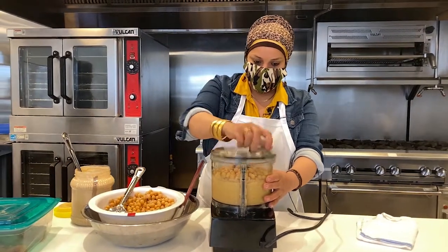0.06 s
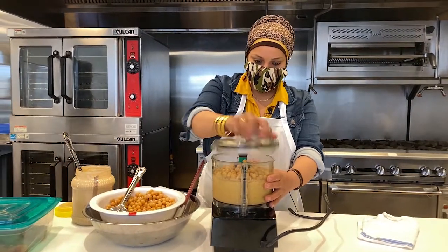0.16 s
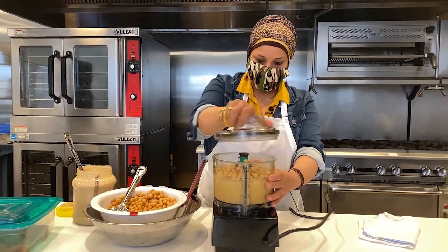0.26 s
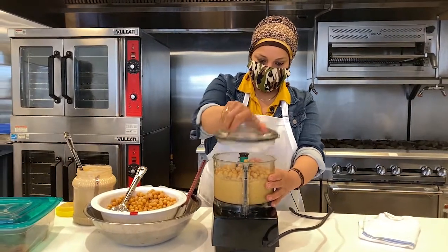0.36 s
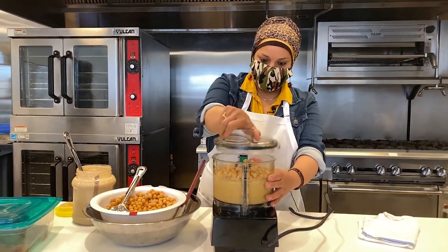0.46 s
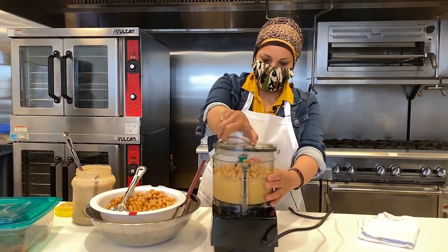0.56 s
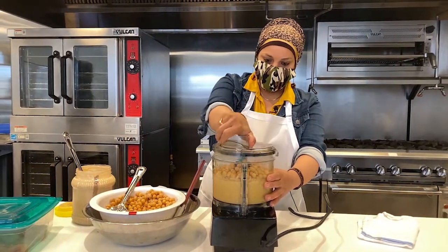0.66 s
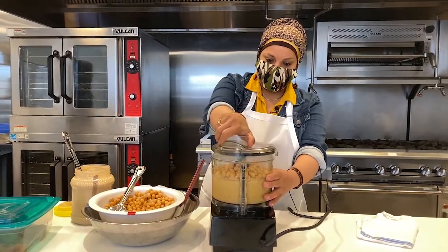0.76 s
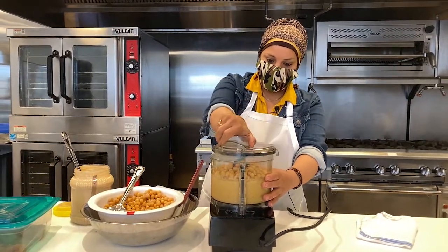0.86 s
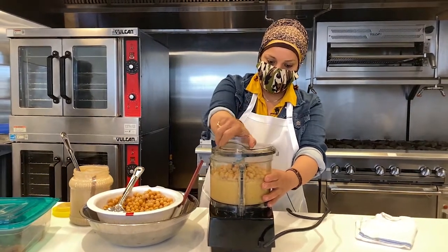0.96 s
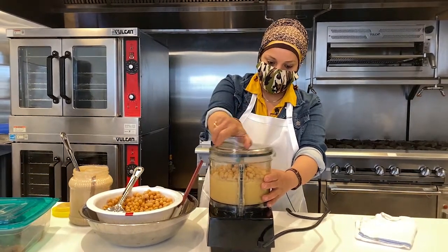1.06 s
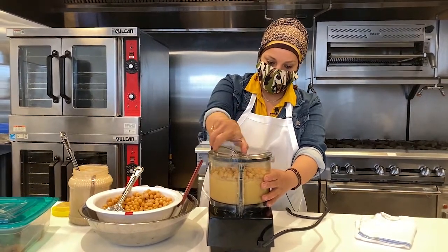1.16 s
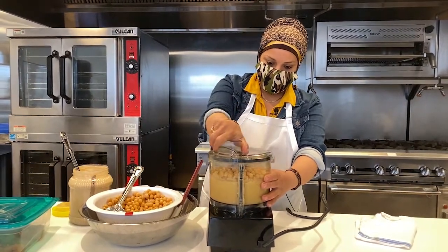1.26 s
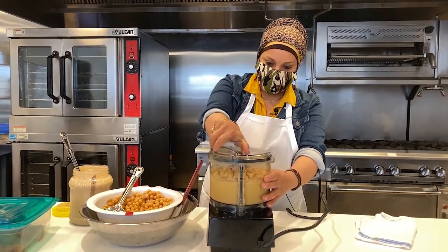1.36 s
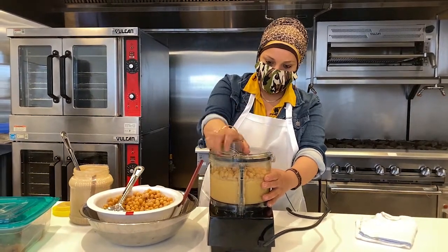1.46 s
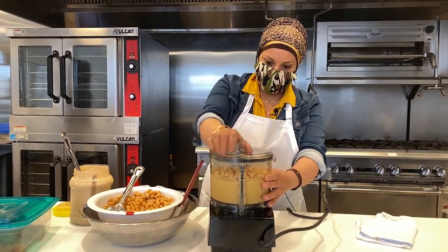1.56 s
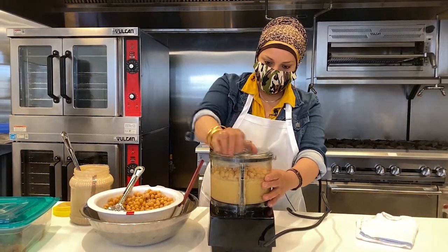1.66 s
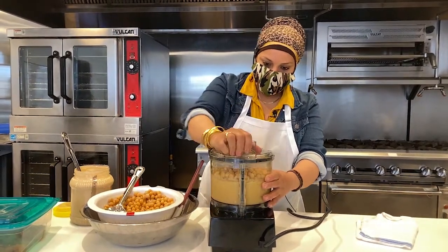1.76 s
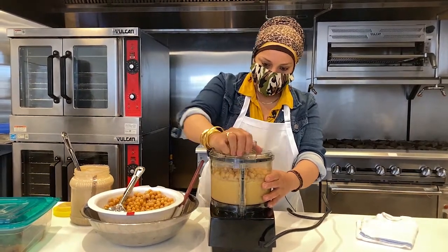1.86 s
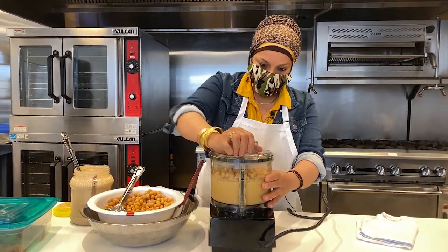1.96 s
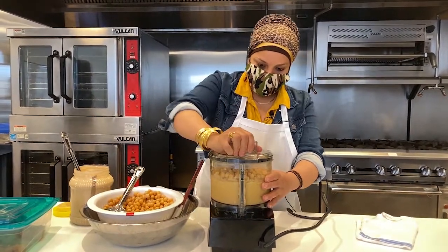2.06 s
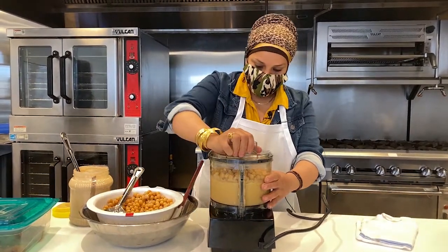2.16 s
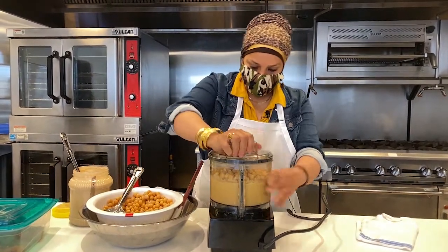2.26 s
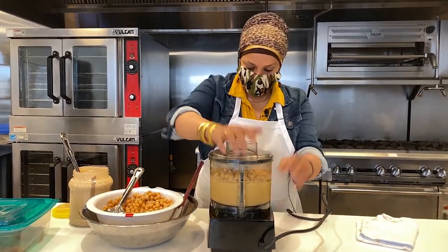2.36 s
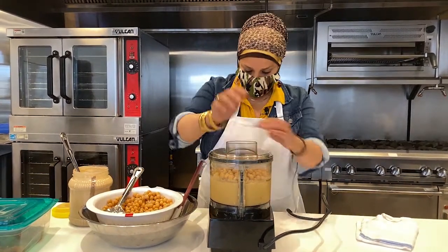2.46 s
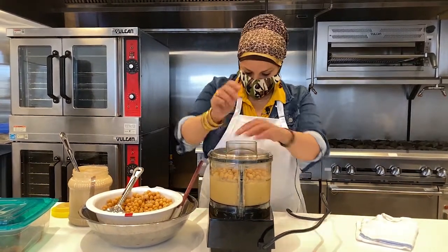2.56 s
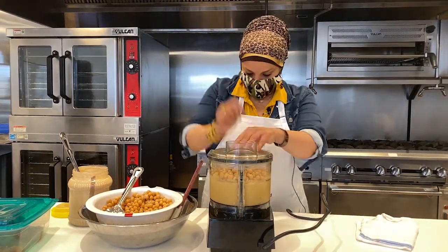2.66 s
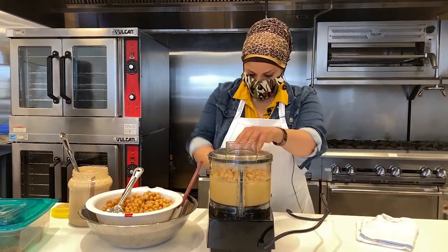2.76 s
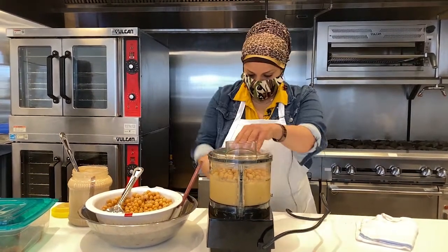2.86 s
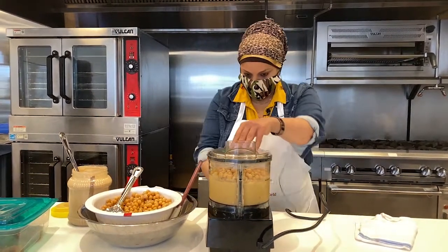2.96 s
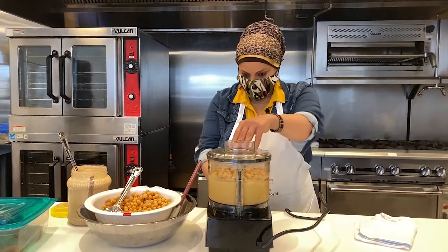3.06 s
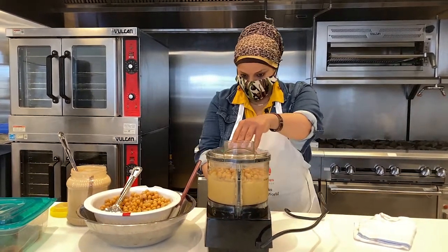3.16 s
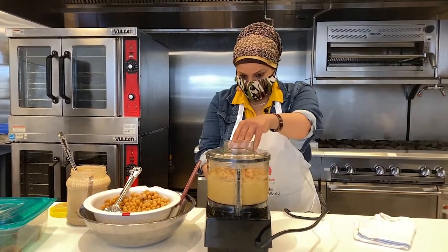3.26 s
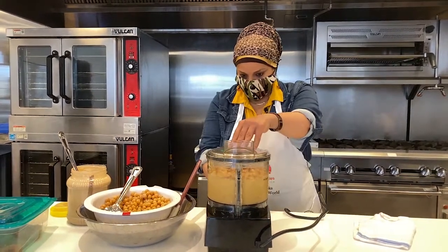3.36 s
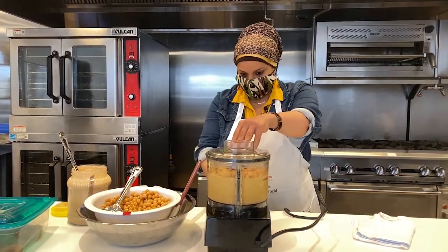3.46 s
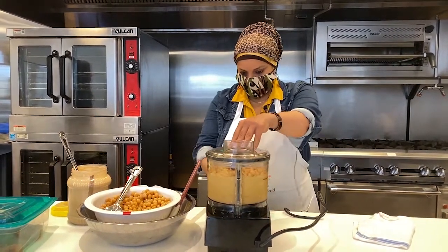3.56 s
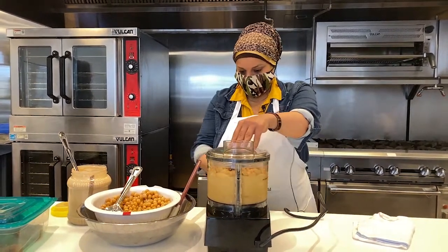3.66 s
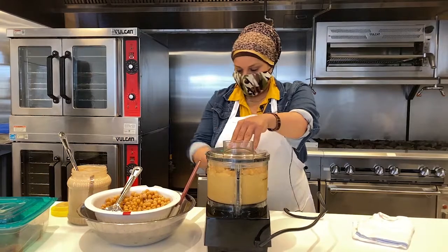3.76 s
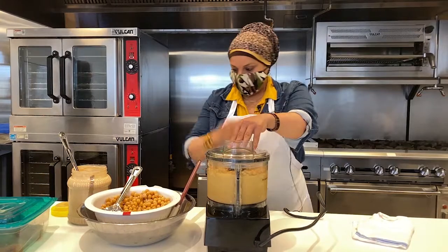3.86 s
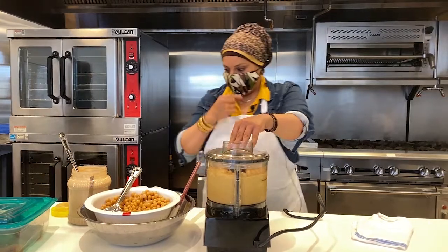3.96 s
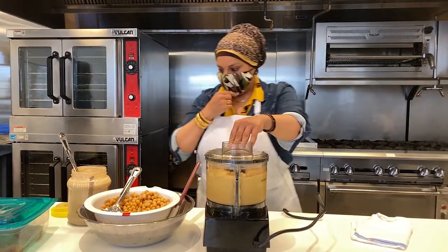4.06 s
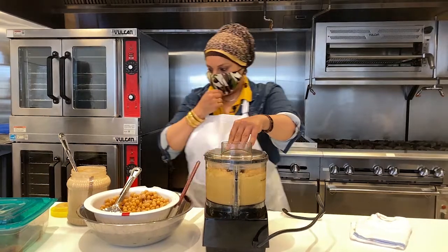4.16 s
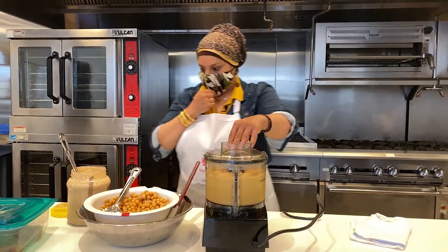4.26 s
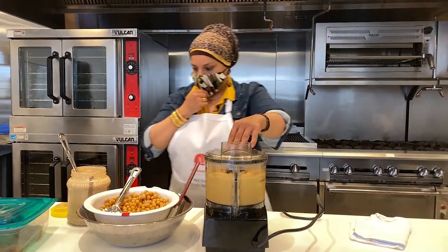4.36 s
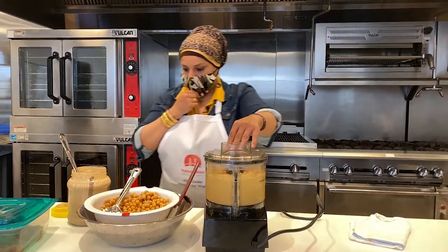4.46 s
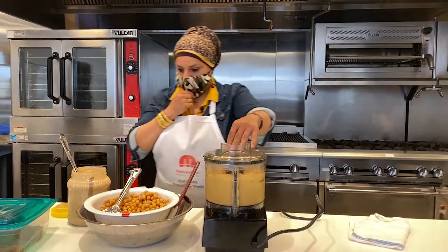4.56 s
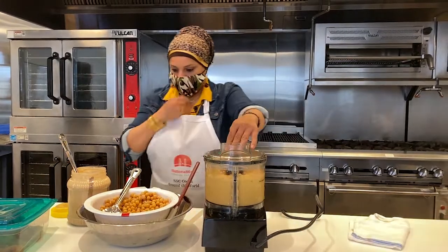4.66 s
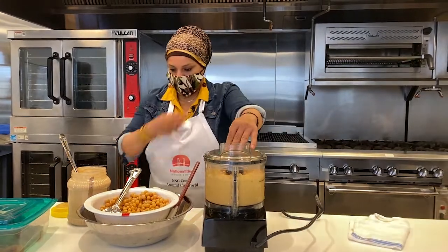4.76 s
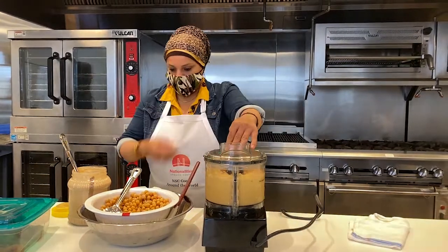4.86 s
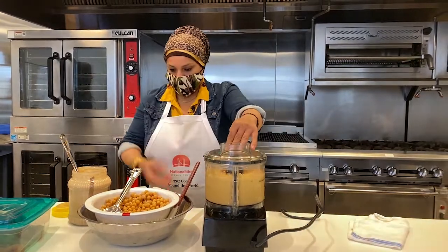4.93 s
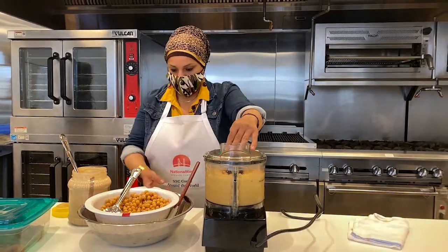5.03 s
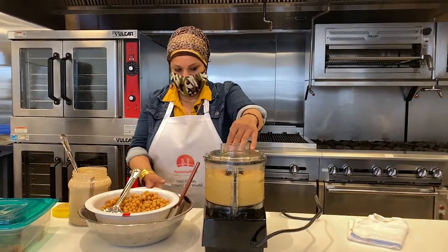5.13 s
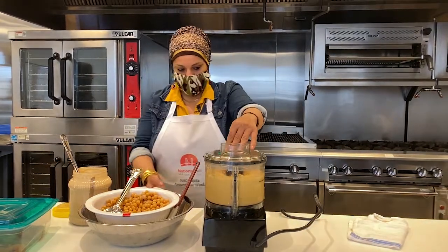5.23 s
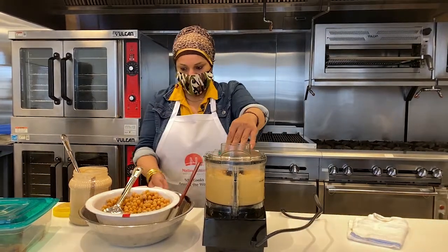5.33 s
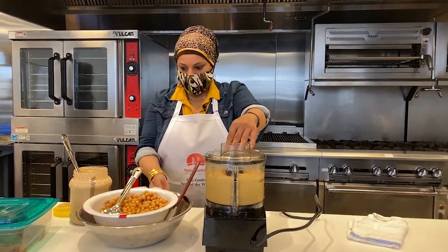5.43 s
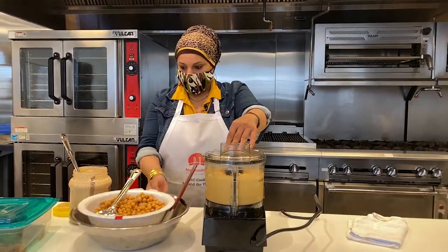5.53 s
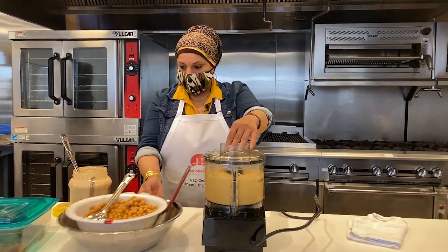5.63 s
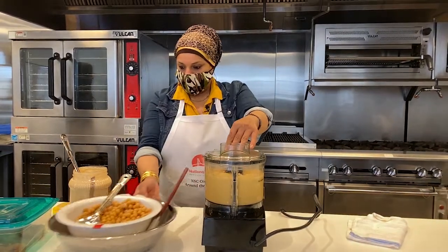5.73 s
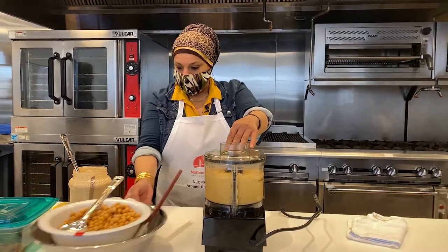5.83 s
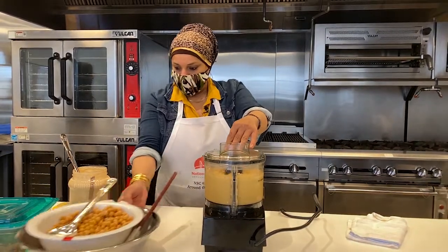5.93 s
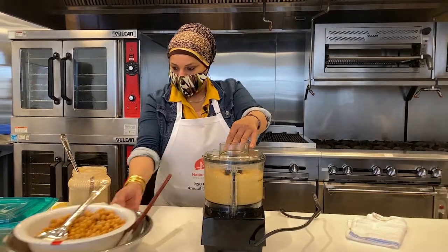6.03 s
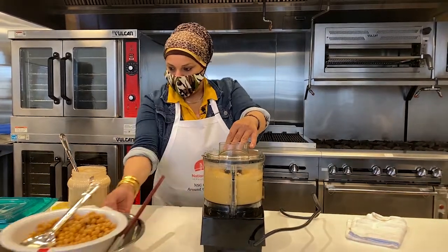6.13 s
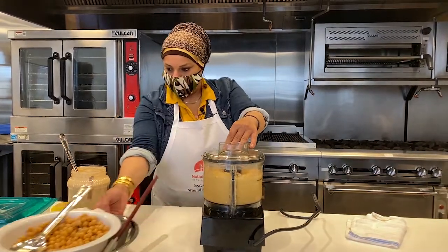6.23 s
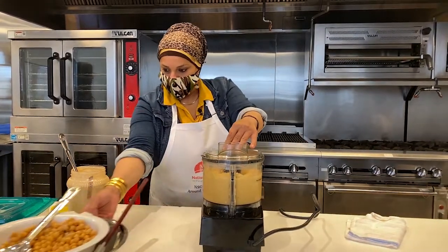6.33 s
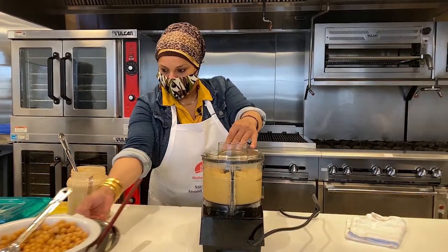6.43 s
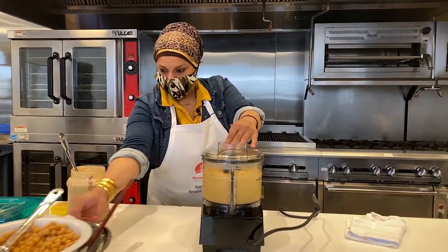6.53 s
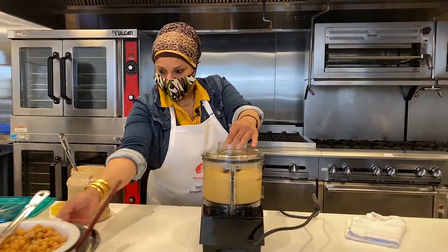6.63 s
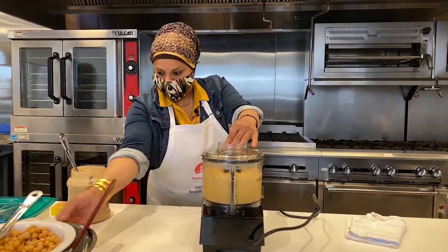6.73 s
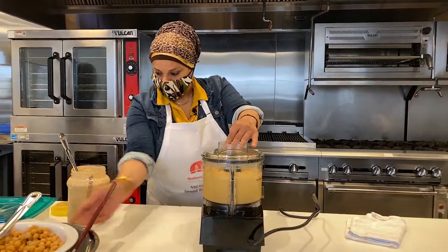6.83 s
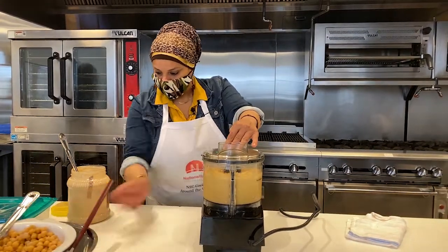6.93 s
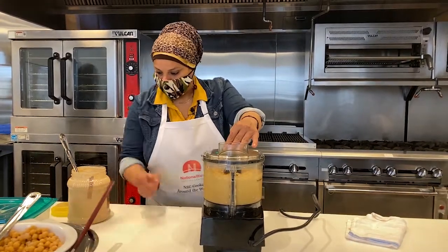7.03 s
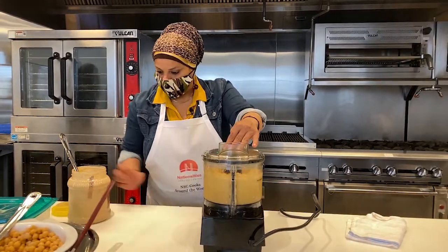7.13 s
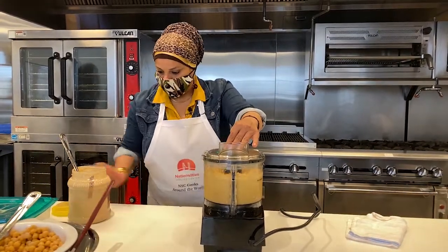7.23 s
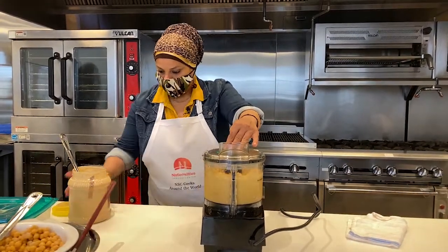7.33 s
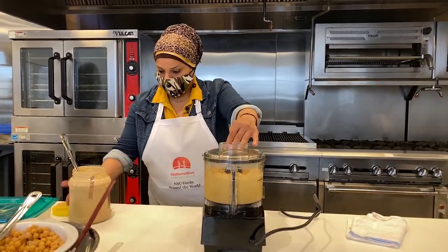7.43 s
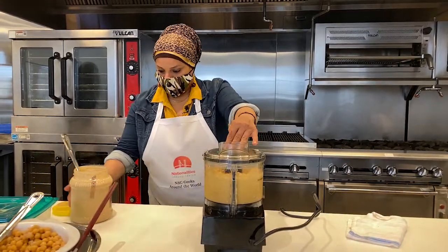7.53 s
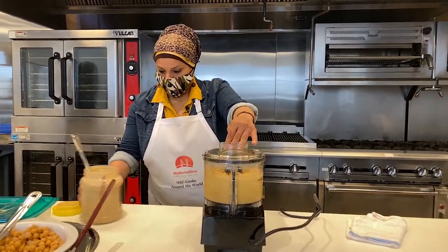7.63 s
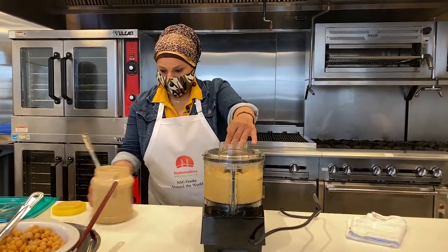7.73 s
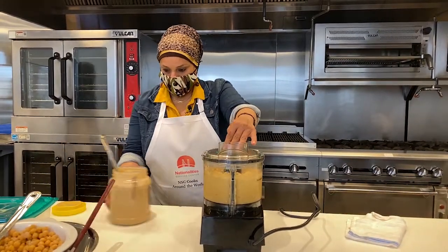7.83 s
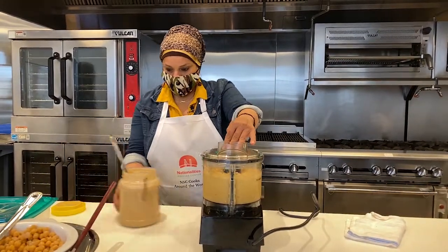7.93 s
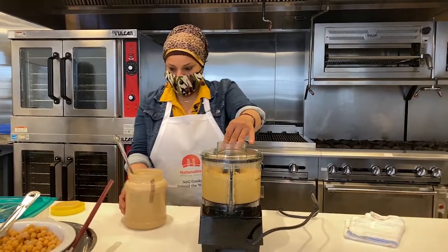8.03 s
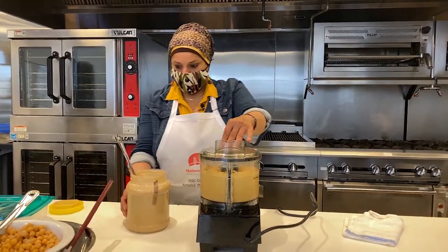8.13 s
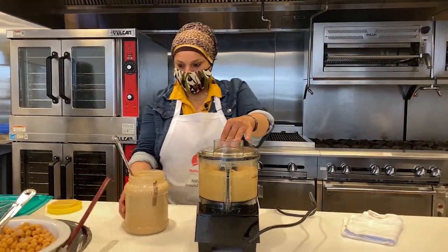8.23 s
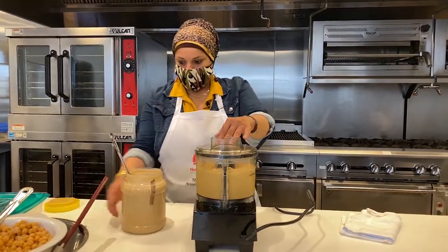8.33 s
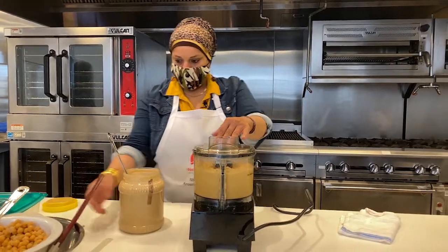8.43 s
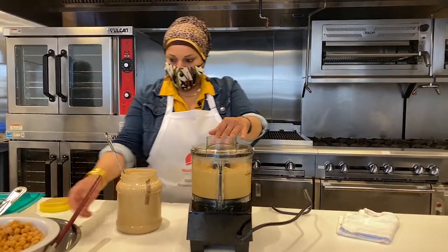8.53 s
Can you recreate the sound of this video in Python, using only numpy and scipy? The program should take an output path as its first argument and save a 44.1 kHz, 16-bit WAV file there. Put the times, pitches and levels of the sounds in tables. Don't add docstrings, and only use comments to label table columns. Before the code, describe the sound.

A plastic lid knocks and twists onto a bowl, locks with a clack, then a switch snaps and a food processor grinds chickpeas loudly.

```python
import sys
import numpy as np
from scipy import signal
from scipy.fft import rfft, irfft
from scipy.io import wavfile
from scipy.ndimage import uniform_filter1d

SR = 44100
rng = np.random.default_rng(int(sys.argv[2]) if len(sys.argv) > 2 else 0)


def amplitude_ratio(level_db):
    exponent = np.asarray(level_db, float) / 20
    return 10 ** exponent


def unload_wav(signal):
    wavfile.write(
        sys.argv[1],
        SR,
        np.round(np.clip(np.atleast_2d(signal).T, -1, 1) * 32767).astype(np.int16),
    )


N = 378819


def evened(x):
    return x / np.sqrt(np.mean(x ** 2) + 1e-20)


def read(points, hz):
    f, value = np.transpose(points)
    return np.interp(np.log(hz + 1), np.log(f + 1), value)


def curves(rows, fade_s=0.0068):
    s, *columns = np.transpose(rows)
    t = np.arange(N) / SR
    return np.clip((t - s[0]) / fade_s, 0, 1), [np.interp(t, s, c) for c in columns]


def add(mix, s, sound):
    part = mix[round(s * SR):][:len(sound)]
    part += sound[:len(part)]


def coloured(x, gain_db):
    log_gain = np.log(amplitude_ratio(np.maximum(np.r_[gain_db, gain_db[-2:0:-1]], -100)))
    taps = np.fft.ifft(np.exp(np.conj(signal.hilbert(log_gain)))).real
    return signal.oaconvolve(x, taps[:2048])[:len(x)]


def slow(rate_hz):
    points = 2 ** 14
    hz = np.fft.rfftfreq(points, 1 / 1000)
    coarse = evened(irfft(rfft(rng.standard_normal(points)) / (1 + (hz / rate_hz) ** 4)))
    return np.interp(np.arange(N) * 1000 / SR, np.arange(points), coarse)


def patchy(x, db, bins=3, frames=9):
    z = signal.stft(x, nperseg=1024, noverlap=768)[2]
    field = uniform_filter1d(rng.standard_normal(z.shape), bins, 0)
    field = uniform_filter1d(field, frames, 1)
    return signal.istft(z * amplitude_ratio(db * evened(field)), nperseg=1024, noverlap=768)[1][:N]


def contact(rub_s, rise_s):
    t = np.arange(SR // 4) / SR
    return rng.standard_normal(len(t)) * (1 - np.exp(-t / rise_s)) * np.exp(-t / rub_s)


def touch_evened(x):
    return x / np.sqrt(np.mean(x[:441] ** 2))


def ring(modes, rub_s, rise_s, rough=1, spread=0.006, scatter_db=0.5):
    t = np.arange(SR // 4) / SR
    hz, db, t60_s = np.transpose(modes)[:, :, None]
    luck = rng.standard_normal((3, len(modes), 1))
    fade = amplitude_ratio(-60 * t / t60_s) * (1 - np.exp(-t * hz / 3))
    wave = np.sin(2 * np.pi * (hz * (1 + spread * luck[1]) * t + .1 * luck[2]))
    gritty = signal.fftconvolve(fade * wave, contact(rub_s, rise_s)[None], axes=1)[:, :len(t)]
    push = (1 - np.exp(-t / rise_s)) * np.exp(-t / rub_s)
    clean = wave * signal.fftconvolve(fade, push[None], axes=1)[:, :len(t)]
    driven = rough * gritty / np.linalg.norm(gritty, axis=1, keepdims=True)
    driven = driven + (1 - rough) * clean / np.linalg.norm(clean, axis=1, keepdims=True)
    return touch_evened((amplitude_ratio(db + scatter_db * luck[0]) * driven).sum(0))


def crack(lo_hz, rub_s, rise_s):
    highpass = signal.butter(6, lo_hz, "high", fs=SR, output="sos")
    return touch_evened(signal.sosfilt(highpass, contact(rub_s, rise_s)))


# frequency in Hz, level in dB per Hz.
RUMBLE = [(15, -27), (25, -42), (48, -2), (82, -1.5), (175, -5.5), (200, -3.5), (223, -5), (309, -13),
          (451, -10), (545, -15.5), (591, -16), (1070, -18.5), (1330, -20.5), (2050, -22), (16000, -48)]
# frequency in Hz, level in dB.
FRIDGE_TONES = [(59.2, -84), (134.6, -58)]


def air():
    rumble_db, fan_hz, fan_db = -53, 1055, -67
    t = np.arange(N) / SR
    noise = rng.standard_normal(N) * amplitude_ratio(0.17 * slow(32))
    rumble = evened(coloured(noise, read(RUMBLE, np.linspace(0, SR / 2, 2049))))
    fridge = sum(amplitude_ratio(db + 0.5 + 2.0 * slow(3)) * np.sin(2 * np.pi * hz * t) for hz, db in FRIDGE_TONES)
    fan = amplitude_ratio(fan_db + 2.6 * slow(8.8)) * np.sin(2 * np.pi * fan_hz * t)
    return amplitude_ratio(rumble_db) * rumble + fridge + fan


# start in seconds, peak in dB, lower ring in dB.
BANGLE_TICKS = [
    (1.463, -30, -52),
    (2.3104, -40.5, -67),
    (2.608, -30, -47),
    (2.6514, -32, -52),
    (2.7028, -40, -58),
    (2.7736, -49, -72),
]
# frequency in Hz, level in dB, t60 in seconds.
BANGLE_MODES = [(4300, -5, .003), (5350, -3, .004), (6300, -1, .004), (7200, 0, .005), (8600, -1, .004)]


def bangles():
    out = np.zeros(N)
    for s, peak_db, low_db in BANGLE_TICKS:
        add(out, s, amplitude_ratio(peak_db - 11.0) * crack(10200, 0.014, 0.00068))
        add(out, s, amplitude_ratio(low_db - 2.0) * ring(BANGLE_MODES, 0.0224, .0006))
    return out


# frequency in Hz, level in dB, t60 in seconds.
RIM_MODES = [(2600, -20, 0.0038), (3100, -3, 0.035), (3600, 8, 0.0013), (4400, -12.5, 0.0041),
             (5060, -4.5, 0.02), (5580, -3.5, 0.0172), (6200, -1, 0.0017)]
# frequency in Hz, level in dB, t60 in seconds.
THUD_MODES = [(218, -5, 0.054), (253.3, 1, 0.07), (283, -6, 0.072), (347, -9.5, 0.0373)]
# frequency in Hz, level in dB, t60 in seconds.
BODY_LOOSE_MODES = [(420, 10.5, 0.035), (620, 7, 0.037), (667, 7.5, 0.035), (830, -4, 0.064)]
# frequency in Hz, level in dB, t60 in seconds.
BODY_SEATED_MODES = [(406, 0.5, 0.09), (650, 3, 0.025), (718, -6, 0.12), (814, -0.5, 0.033),
                     (1117, -2, 0.0091)]
# frequency in Hz, level in dB, t60 in seconds.
LATCH_LOOSE_MODES = [(1242, 0, .06), (1670, -2.5, 0.022), (2000, -10, .03), (2390, -12, .03),
                     (3420, -14, 0.036), (3720, -15, 0.034)]
# frequency in Hz, level in dB, t60 in seconds.
LATCH_SEATED_MODES = [(1100, -8.5, .12), (1500, -8, 0.029), (1716, -3, 0.056), (1730, -0.5, 0.023),
                      (1880, -13.5, .03), (2440, -6.5, .04), (2900, -4, .02), (3300, -12, .02)]


def lid(events, rub_s, rise_s, trim_db):
    seated_s, tilted_s, tilted_ratio = 1, 1.13, 1.3
    rim_trim, latch_trim, fizz_trim, thud_trim, body_trim = trim_db
    out = np.zeros(N)
    for s, rim_db, thud_db, body_db, latch_db in events:
        loose = s < seated_s
        fizz_db = rim_db - 12.5 - 28 * loose
        latch = LATCH_LOOSE_MODES if loose else LATCH_SEATED_MODES
        body = BODY_LOOSE_MODES if loose else BODY_SEATED_MODES
        thud = np.multiply(THUD_MODES, (tilted_ratio if s < tilted_s else 1, 1, 1))
        add(out, s, amplitude_ratio(rim_db + rim_trim) * ring(RIM_MODES, rub_s, rise_s))
        add(out, s, amplitude_ratio(latch_db + latch_trim) * ring(latch, rub_s, rise_s, 0.93))
        add(out, s, amplitude_ratio(fizz_db + fizz_trim) * crack(5900, 1.4 * rub_s, rise_s))
        add(out, s, amplitude_ratio(thud_db + thud_trim) * ring(thud, 0.23 * rub_s, rise_s, 0.1))
        add(out, s, amplitude_ratio(body_db + body_trim) * ring(body, rub_s, rise_s))
    return out


# start in seconds, rim tick peak, bowl thud, lid body, latch clack in dB.
LID_KNOCKS = [
    (0.6516, -36, -63, -40, -32),
    (0.6717, -45, -38, -35.5, -27.5),
    (1.1165, -19.5, -10, -35, -26),
    (1.1351, -17, -12, -31, -21.5),
    (1.139, -40, -1, -31.5, -40),
    (1.4274, -25, -16.5, -54, -37),
    (1.6884, -29, -45, -51.5, -38),
]
# start in seconds, rim tick peak, bowl thud, lid body, latch clack in dB.
LID_SCUFFS = [(0.593, -61, -62, -57, -61), (0.6983, -58, -60, -46, -51), (0.787, -53, -70, -55, -58),
              (0.8694, -46, -48, -38.5, -40), (0.889, -48, -53, -37, -45), (0.908, -55, -57, -37, -40.5),
              (1.0925, -33, -23, -48, -26), (1.1826, -54, -16.5, -50, -51), (1.233, -62, -19.5, -79, -63),
              (1.3976, -33, -37, -79, -57), (1.4623, -34, -25, -59.5, -25.5), (1.489, -43, -31, -60, -31),
              (1.512, -54, -33, -65, -51), (1.631, -34.5, -58, -70, -34), (1.36, -70, -34, -72, -70),
              (1.661, -37, -46, -61, -48), (1.7194, -56.5, -53, -66, -62), (1.9365, -23, -46, -55, -17),
              (1.944, -50.5, -42, -32, -50), (3.016, -53, -60, -64, -55), (3.0428, -50, -56, -61, -48),
              (3.053, -54, -60, -68, -53), (3.088, -55, -60, -64, -56)]


def knocks():
    sharp = lid(LID_KNOCKS, 0.008, 0.00041, (-16.5, -10.0, -12.5, -20.0, -2.5))
    soft = lid(LID_SCUFFS, 0.019, 0.0016, (-15.0, -16.5, -15.5, -19.0, -4.5))
    return sharp + soft


# start in seconds, peak in dB, fine fizz in dB.
SNAP_EVENTS = [
    (0.3416, -22, -37.5),
    (1.4268, -20, -39.5),
    (1.6876, -28.5, -57),
    (1.9419, -7, -27.5),
    (3.1161, -32, -34.5),
    (3.1333, -9.5, -24),
]
# frequency in Hz, level in dB, t60 in seconds.
PUSHER_MODES = [(1150, -20, 0.034), (1480, -11, 0.023), (1800, -10, 0.11), (2300, -6.5, 0.027),
                (2600, -7, 0.1), (3080, -2, 0.06), (3350, -3, .03), (3670, -2, 0.044), (4380, -7.5, 0.022),
                (5500, -12, .01), (6400, -22, .01)]
# frequency in Hz, level in dB, t60 in seconds.
PING_MODES = [(1230, -8, .04), (1730, 0, .07), (1960, -8, .05), (2440, -2, .09), (3160, 7, 0.011),
              (3240, 4, 0.03), (4460, -2, .012), (5100, -11, .012), (5700, -12, .01)]
# frequency in Hz, level in dB, t60 in seconds.
TICK_MODES = [(1510, 0, .02), (2500, -12, .03), (3260, -5, .04), (3600, 5, .04), (4260, -4, .02),
              (4560, 1, .03), (5300, 4, .03), (5620, -3, .02), (6740, -13, .02)]
# frequency in Hz, level in dB, t60 in seconds.
LOCK_MODES = [(710, -15, .02), (1040, -3, 0.022), (1450, -4.5, 0.014), (1655, -6, 0.57), (1718, 3, 0.025),
              (1950, -2, 0.027), (2300, 1, 0.021), (2600, 1, 0.039), (2920, -7, 0.02), (3220, -9, 0.014),
              (3770, 2, 0.014), (4120, 1, 0.0087), (5100, -0.5, 0.0057), (5970, -9, .006),
              (7040, -14, 0.003), (8000, -6, .003)]
# frequency in Hz, level in dB, t60 in seconds.
SWITCH_MODES = [(886, -2, 0.016), (2280, 2, 0.018), (2440, 6.5, 0.015), (2800, 11, 0.0066),
                (3050, 3, 0.011), (3350, 1, .012), (3700, 7, .015), (4100, 7, 0.022), (4570, -3, 0.016),
                (5580, -5, .008), (6530, -4, .008)]
# (Hz, dB, t60 in seconds).
LOCK_SEAT = (1.942, -37, [(120, -9, 0.025), (194, -1.5, .05), (227, 7, 0.088), (500, -12, .05)])


def snaps():
    out = np.zeros(N)
    parts = (PUSHER_MODES, PING_MODES, TICK_MODES, LOCK_MODES, SWITCH_MODES, SWITCH_MODES)
    for (s, peak_db, fizz_db), modes in zip(SNAP_EVENTS, parts):
        add(out, s, amplitude_ratio(peak_db - 8.5) * ring(modes, 0.00036, 0.00035, 0.3))
        add(out, s, amplitude_ratio(fizz_db - 4.0) * crack(3400, 0.027, 0.00049))
    seat_s, seat_db, seat_modes = LOCK_SEAT
    add(out, seat_s, amplitude_ratio(seat_db) * ring(seat_modes, 0.0036, 0.002, 0.1))
    return out


# time in seconds, turns per second.
SHAFT_SPEED = [(3.15, 28.8), (3.4, 29.6), (4.5, 29.75), (5.5, 29.85), (8.59, 29.87)]


def shaft_angle():
    return 2 * np.pi * np.cumsum(curves(SHAFT_SPEED)[1][0]) / SR


# time in seconds, churning violence in dB, coarseness 1 whole peas - 0 paste.
FOOD_STATE = [(3.14, 4, .1), (3.15, -9, 0.29), (3.18, -14, 0.69), (3.23, -0.5, 0.43), (3.35, 0, 1),
              (3.62, 1, 1), (3.74, 3.5, 1), (3.82, 2, 1), (3.96, 0, 0.8), (4.4, 0.5, 0.65), (4.7, 0, 0.77),
              (5.1, -1, 0.91), (5.6, -0.5, 0.87), (6.3, 0.5, 0.65), (6.8, 1, 0.22), (7.3, 0, 0.18),
              (7.9, 0.5, 0.2), (8.59, 0, 0.33)]
# start in seconds, peak in dB, wall ring in Hz, treble in dB.
HARD_LUMPS = [(3.201, -19.5, 3000, -42), (3.2193, -8.5, 3050, -19), (3.3008, -13.5, 2900, -22),
              (3.4351, -17, 3140, -20), (3.4862, -16, 3310, -20), (3.724, -9.5, 3860, -35),
              (3.897, -11, 2980, -31), (3.932, -20, 3050, -28), (4.22, -17, 3040, -34),
              (4.3903, -17, 3050, -42.5), (4.4944, -14.5, 2900, -22), (4.554, -12, 3840, -16),
              (5.1685, -14, 2700, -41), (5.312, -16.5, 2970, -25), (5.919, -15, 3080, -39),
              (6.3247, -14, 3050, -24), (6.558, -16.5, 2940, -45), (6.6878, -14.5, 2820, -22),
              (6.7554, -8.5, 2910, -29), (7.1055, -13, 3600, -32), (7.1424, -9, 3560, -22),
              (7.8013, -15, 3020, -40), (7.831, -16.5, 3100, -30), (7.8667, -15, 3380, -25),
              (8.2193, -11.5, 2300, -26), (8.2566, -14, 2500, -22), (8.3132, -16, 3350, -30),
              (8.349, -14, 2740, -22), (8.4252, -17, 3800, -30), (8.5006, -11, 3050, -32)]


def food():
    burst_from_db, burst_share, burst_s = -16, .6, .01
    on, (violence_db, coarse) = curves(FOOD_STATE)
    blows = np.zeros(N)
    for s, peak_db, *_ in HARD_LUMPS:
        blows[round(s * SR)] = burst_share * max(peak_db - burst_from_db, 0)
    bursts_db = signal.lfilter([1], [1, -np.exp(-1 / (burst_s * SR))], blows)
    return on, violence_db + bursts_db, np.clip(coarse, 0, 1)


def surges(rows):
    out = np.zeros(N)
    for s, length_s, db in rows:
        add(out, s - length_s / 2, amplitude_ratio(db) * np.hanning(round(length_s * SR)))
    return out


# multiple of shaft speed, level in paste in dB, level in whole peas in dB.
LOADED_ORDERS = [(6, -45.5, -48), (7, -44.5, -46), (9, -36, -72), (7.5, -68, -61), (11, -67, -57)]
# centre in seconds, length in seconds, level in dB.
ORDER_SURGES = [
    [(3.46, 0.49, -41), (3.82, .2, -46), (3.69, 0.15, -35), (3.97, 0.26, -36), (4.15, 0.44, -37),
     (4.42, 0.25, -41), (6.44, 0.17, -42), (7.1, 0.7, -52)],
    [(3.32, 0.2, -39), (3.58, 0.21, -33.5), (3.92, 0.17, -33), (4.4, 0.28, -48), (4.68, .15, -50),
     (6.53, 0.15, -44), (7.06, 0.7, -51)],
    [(3.22, 0.22, -40), (3.69, 0.11, -42), (3.96, 0.076, -38), (4.17, 0.27, -65), (4.4, 0.19, -50),
     (4.68, .16, -38.5), (4.88, 0.24, -38.5), (5.39, 0.11, -29), (5.66, 0.15, -33.5), (5.95, 0.69, -35.5),
     (6.3, 0.41, -37.5), (6.62, 0.77, -40.5), (7.0, 0.23, -39.5), (7.29, 0.12, -39), (7.6, 0.74, -43),
     (8.05, 0.97, -46)],
    [(3.56, .14, -44), (3.8, 0.37, -33.5), (4.02, .12, -40)],
    [(3.4, 0.12, -41), (4.53, 0.12, -41), (4.75, 0.3, -42)],
]
# multiple of shaft speed, level in dB.
STEADY_ORDERS = [(2, -59.5), (5, -51.5), (8, -72), (13, -63), (15, -57.5), (41, -47.5), (60, -49)]
# time in seconds, level in dB.
WHINE_LEVEL = [(3.15, -58), (6.3, -56), (6.8, -48), (8.59, -47)]


def motor():
    on_s, whine_hz = 3.15, 4870
    hum_hz, hum_db = 120, -51.5
    t = np.arange(N) / SR
    coarse = food()[2]
    on = np.clip((t - on_s) / 0.011, 0, 1)
    angle = shaft_angle()
    orders = [(k, amplitude_ratio(db)) for k, db in STEADY_ORDERS]
    for (k, paste_db, peas_db), rows in zip(LOADED_ORDERS, ORDER_SURGES):
        orders.append((k, amplitude_ratio(paste_db + (peas_db - paste_db) * coarse) + surges(rows)))
    shaft = np.zeros(N)
    for k, gain in orders:
        phase = round(2 * k) / 2 * angle + 0.099 * k * slow(4.5)
        shaft += gain * amplitude_ratio(2.6 * slow(37)) * np.cos(phase)
    hum = amplitude_ratio(hum_db + 0.5 * slow(9)) * np.cos(2 * np.pi * hum_hz * t)
    whine_gain = amplitude_ratio(curves(WHINE_LEVEL)[1][0] + 3 * slow(30) + 3 * slow(5))
    whine = whine_gain * np.cos(2 * np.pi * whine_hz * t + 2.4 * slow(50))
    return on * np.sqrt(2) * (shaft + hum + whine)


# frequency in Hz, level in dB per Hz.
CLATTER_TONE = [(350, -30), (600, -5), (880, -7.5), (969, -10), (1220, -2), (1870, -2.5), (2390, -2),
                (2930, 1), (3970, -1), (4360, -7.5), (6950, -10.5), (8080, -16.5), (9500, -14),
                (11500, -20.5), (14200, -18.5), (15800, -24)]
# frequency in Hz, width in Hz, level in dB.
WALL_RINGS = [(870, 56, 7), (1254, 12, 10), (1430, 60, 2.5), (1646, 55, 4.5), (1775, 60, 4.5),
              (1917, 66, 5.5), (2900, 120, 2), (3020, 77, 0.5), (3540, 84, 1), (4740, 20, 9.5)]
# frequency in Hz, level in dB per Hz.
SLOSH_TONE = [(30, -38), (100, -17.5), (165, -5), (235, 3), (300, -2.5), (400, -0.5), (520, -6.5),
              (850, -8.5), (1000, -8), (1300, -18), (2500, -56.5)]
BLADE_CHOP = [(9, .08), (10, .07), (6, .06)]


def churn():
    clatter_db, treble_db, treble_share = -27, -38, 0.95
    slosh_paste_db, slosh_peas_db = -41.5, -32
    impacts_per_s = 6000
    on, violence_db, coarse = food()
    hz = np.linspace(0, SR / 2, 2049)
    wall_db = read(CLATTER_TONE, hz)
    wall_db = wall_db + sum(db / (1 + (2 * (hz - f) / width) ** 2) for f, width, db in WALL_RINGS)
    split = 1 / (1 + (hz / 7000) ** 8)

    size = amplitude_ratio(3.0 * np.minimum(rng.exponential(1, N), 3.2)) * rng.choice([-1, 1], N)
    hail = evened(size * (rng.random(N) < impacts_per_s / SR))
    hail = hail * amplitude_ratio(1.13 * slow(63) + 1.5 * slow(170)) + 0.89 * rng.standard_normal(N)
    angle = shaft_angle()
    hail = hail * (1 + sum(depth * np.cos(k * angle) for k, depth in BLADE_CHOP))

    body = evened(patchy(coloured(hail, wall_db + 10 * np.log10(split)), 2))
    treble = coloured(hail * amplitude_ratio(0.77 * slow(90)), wall_db + 10 * np.log10(1 - split + 1e-9))
    treble = evened(patchy(treble, 0.9, bins=30, frames=30))
    slosh = evened(coloured(rng.standard_normal(N) * amplitude_ratio(0.82 * slow(23)), read(SLOSH_TONE, hz)))

    out = amplitude_ratio(clatter_db + violence_db) * body
    out += amplitude_ratio(treble_db + treble_share * violence_db) * treble
    out += amplitude_ratio(slosh_paste_db + (slosh_peas_db - slosh_paste_db) * coarse) * slosh
    return on * out


# start in seconds, peak in dB, wall ring in Hz, treble in dB.
BRIGHT_LUMPS = [
    (7.323, -17, 4970, -32),
    (7.8008, -17, 5020, -34),
    (8.4997, -15.5, 5580, -34),
]
# start in seconds, peak in dB, wall ring in Hz, treble in dB.
LESSER_LUMPS = [(3.236, -16, 2800, -40), (3.2445, -21, 3600, -40), (3.381, -17, 3000, -35),
                (3.598, -20, 2950, -35), (3.748, -9, 3260, -26), (3.765, -13, 2940, -35),
                (3.787, -15, 2600, -32), (3.799, -23, 2600, -35), (4.3107, -17, 2950, -34),
                (5.257, -23, 3020, -38), (5.608, -21, 3060, -38), (6.0609, -26, 2930, -40),
                (6.1697, -19, 3600, -36), (7.167, -15, 2600, -35), (7.546, -17, 3000, -38),
                (7.6163, -17, 3000, -38), (7.6803, -18, 3000, -38), (7.7676, -19, 2980, -38),
                (5.5475, -17, 2800, -36), (5.5889, -21, 2900, -36), (5.7186, -31, 3070, -36),
                (5.9002, -17, 3280, -34), (6.2324, -19, 2300, -34), (6.439, -17, 2880, -33),
                (6.4582, -16, 2300, -36), (6.82, -18, 3300, -32), (7.4212, -17, 2200, -36),
                (7.7265, -18, 2930, -36), (7.971, -18, 2970, -34), (8.0082, -18, 3020, -32),
                (3.279, -16, 3250, -30), (3.352, -18, 3600, -25)]
# ratio to its ring, level in dB, t60 in seconds.
LUMP_MODES = [(.62, -9, .004), (.8, -2, .006), (1, 3, 0.009), (1.17, 1, .006), (1.36, -3, 0.005),
              (1.6, -6, 0.004), (1.9, -9, .004)]
# start in seconds, peak in dB.
SPLINTERS = [(3.2164, -14), (3.2412, -17), (3.293, -24), (3.468, -19), (3.564, -17), (4.0, -18),
             (4.22, -12), (4.518, -7.5), (4.5537, -26), (4.686, -18), (4.7209, -20), (5.1688, -19),
             (5.307, -17), (6.1336, -28), (6.2055, -20), (6.2327, -18), (6.606, -14), (6.754, -19),
             (6.8191, -19), (7.0386, -27), (7.142, -19), (7.1803, -17), (7.472, -17), (7.6881, -19),
             (7.727, -14), (7.8315, -26.5), (7.8865, -14), (8.2778, -15), (8.406, -18), (8.4334, -20),
             (8.5008, -21)]
# (Hz, dB, t60 in seconds).
BASE_JOLT = (3.262, -47, [(108, -2, 0.1), (130, -1, 0.09), (165, 0, .09)])


def lumps():
    out = np.zeros(N)
    for s, peak_db, ring_hz, treble_db in HARD_LUMPS + BRIGHT_LUMPS + LESSER_LUMPS:
        hit = ring(np.multiply(LUMP_MODES, (ring_hz, 1, 1)), .001, .0003, .3)
        add(out, s, amplitude_ratio(peak_db) * hit / abs(hit).max())
        lowpass = signal.butter(2, 1.67 * ring_hz, fs=SR)
        snap = signal.lfilter(*lowpass, crack(1700, 0.0023, 0.0002))
        add(out, s, amplitude_ratio(peak_db - 5.0) * snap / abs(snap).max())
        add(out, s, amplitude_ratio(treble_db - 15.5) * crack(5300, 0.0024, 0.00048))
    for s, peak_db in SPLINTERS:
        add(out, s, amplitude_ratio(peak_db - 18.5) * crack(7400, 0.0011, 0.00024))
    jolt_s, jolt_db, jolt_modes = BASE_JOLT
    add(out, jolt_s, amplitude_ratio(jolt_db) * ring(jolt_modes, 0.0069, 0.0026, 0.1))
    return out


# frequency in Hz, t60 in seconds.
KITCHEN_T60 = [(200, 0.81), (1000, 0.54), (2500, 0.7), (5000, 0.68), (10000, 0.55), (16000, 0.12)]


def echoes():
    taps = np.zeros(SR)
    at = np.arange(200, SR - 20, 20)
    taps[at + rng.integers(0, 20, len(at))] = rng.choice([-1., 1.], len(at))
    hz, t, z = signal.stft(taps, SR, nperseg=256)
    decay = amplitude_ratio(-60 * t / read(KITCHEN_T60, hz)[:, None])
    tail = signal.istft(z * decay, SR, nperseg=256)[1]
    return tail / np.linalg.norm(tail)


def kitchen(x, paths=7, turn_s=.008):
    place = np.arange(N) / SR / turn_s * paths
    out = np.zeros(N)
    for k in range(paths):
        distance = abs((place - k + paths / 2) % paths - paths / 2)
        share = np.cos(np.pi / 2 * np.minimum(distance, 1))
        out += signal.fftconvolve(x * share, echoes())[:N]
    return out


# frequency in Hz, level in dB.
WALL_TONE = [(200, -13), (500, -2), (1000, 0.5), (1700, 1.5), (2500, 4.5), (3300, -5), (4300, -0.5),
             (8000, 2), (16000, -1)]


def scene():
    hands = knocks() + snaps() + bangles()
    hard = lumps()
    thrown = amplitude_ratio(-11.0) * hands + amplitude_ratio(-7.5) * hard
    thrown = coloured(thrown, read(WALL_TONE, np.linspace(0, SR / 2, 2049)))
    return (hands + hard + kitchen(thrown) + motor() + churn() + air())[None]


def top_cut(x):
    return signal.sosfilt(signal.butter(12, 16500, fs=SR, output="sos"), x)


# frequency in Hz, gain.
BAND_LIMIT = [(0, 1), (15860, 1), (15910, .03), (16290, .02), (16330, 0), (SR / 2, 0)]


def record(dry):
    soft = .7 * np.tanh(dry / .7)
    limit = signal.firwin2(2001, *np.transpose(BAND_LIMIT), fs=SR, window=("kaiser", 6))
    mix = signal.oaconvolve(soft, limit[None], "same")
    return top_cut(mix)


dry = scene()
out = record(dry)
unload_wav(out)
```